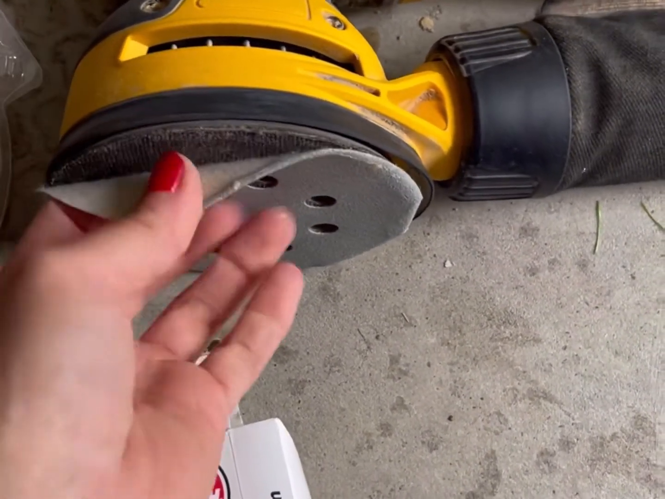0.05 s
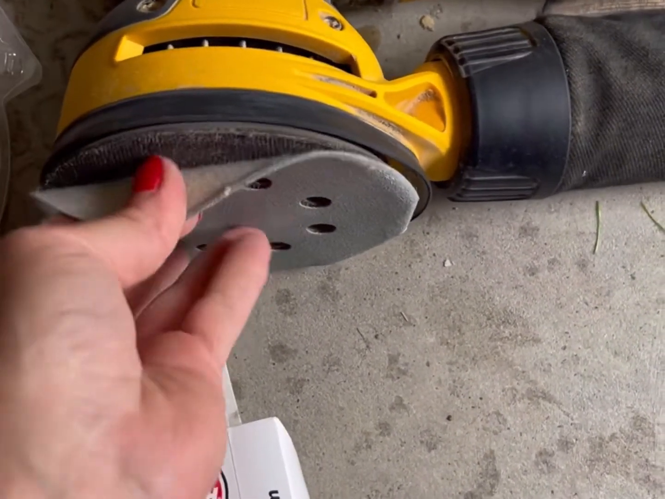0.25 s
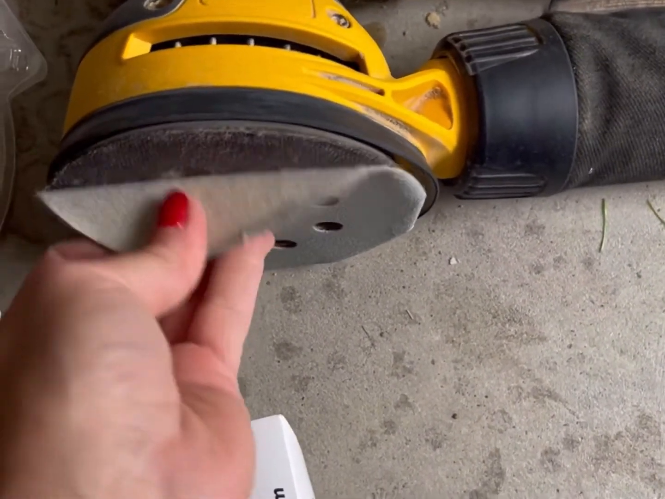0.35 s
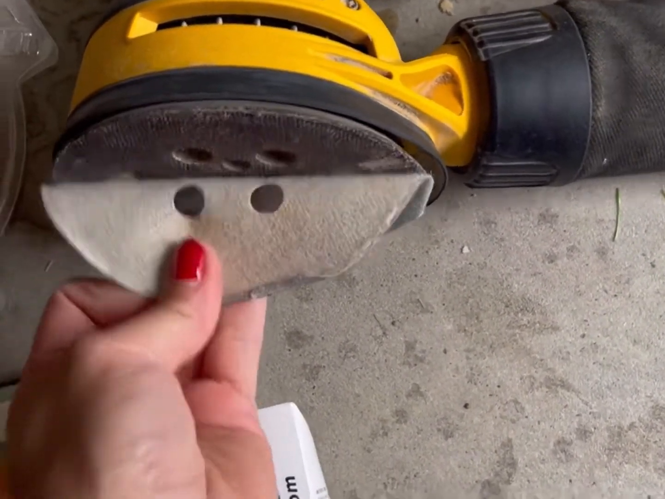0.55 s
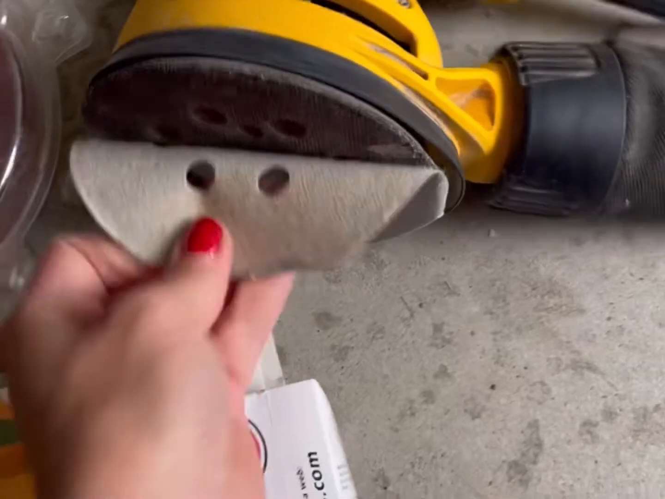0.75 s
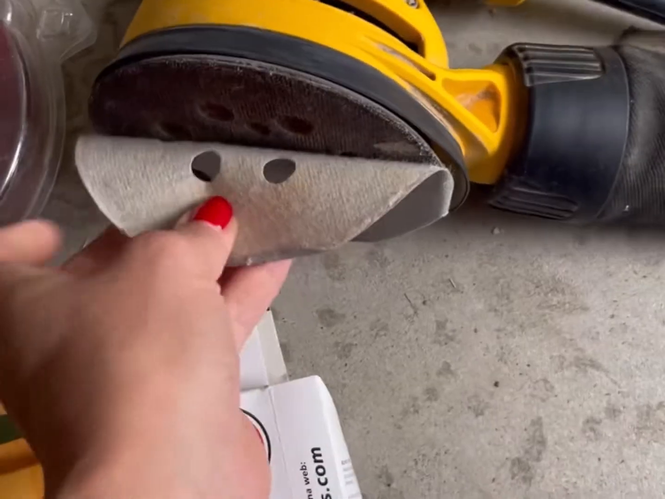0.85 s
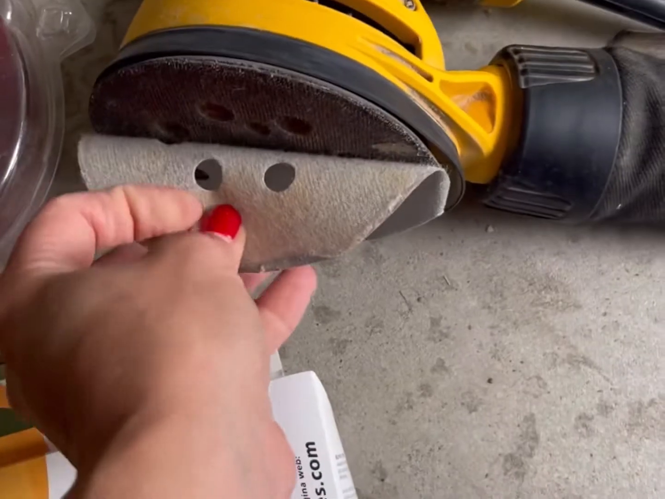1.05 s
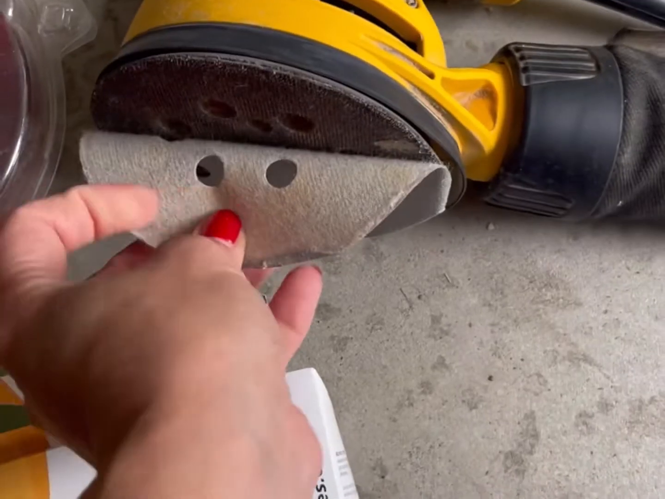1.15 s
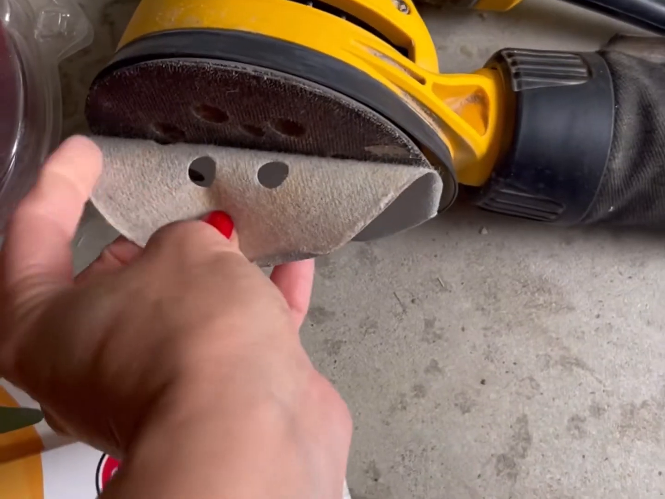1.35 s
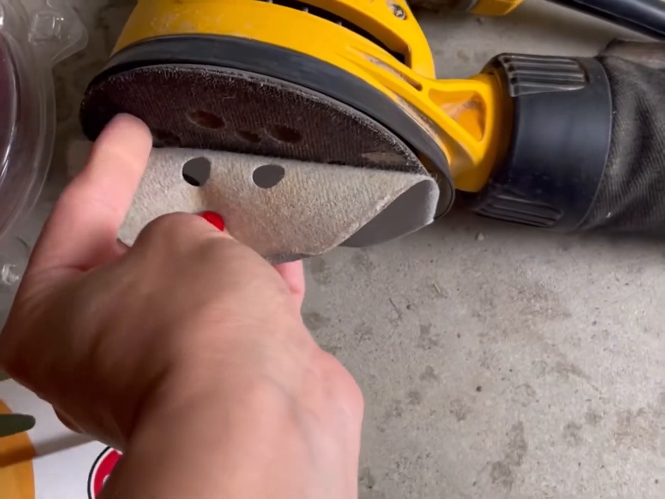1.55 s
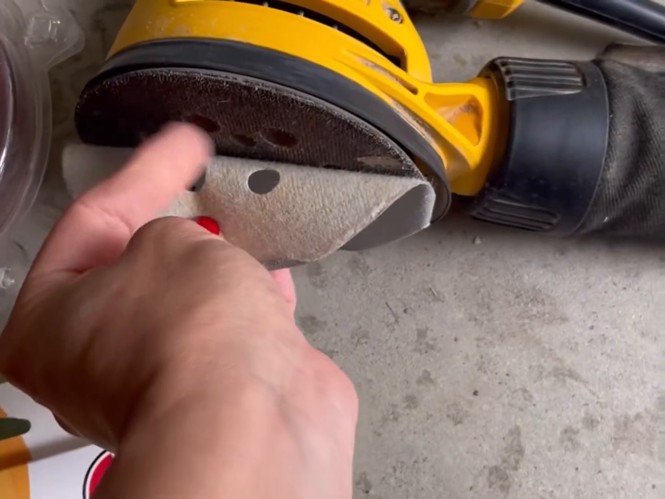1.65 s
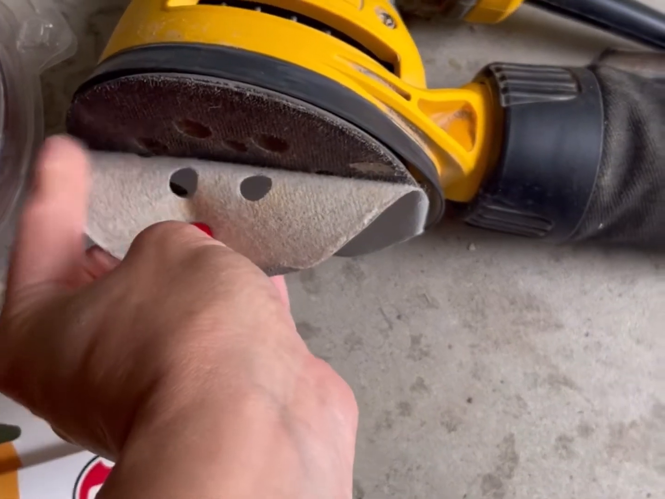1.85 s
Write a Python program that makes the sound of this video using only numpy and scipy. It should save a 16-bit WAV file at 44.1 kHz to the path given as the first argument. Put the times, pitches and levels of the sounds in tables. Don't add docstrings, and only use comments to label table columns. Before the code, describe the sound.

Dry, crackly tearing of a sanding disc peeled from its pad, followed by light fingernail taps

```python
import sys
import numpy as np
from scipy import signal
from scipy.fft import rfft, irfft
from scipy.io import wavfile
from scipy.ndimage import uniform_filter1d

SR = 44100
rng = np.random.default_rng(int(sys.argv[2]) if len(sys.argv) > 2 else 0)


def gain_from_decibels(decibels):
    exponent = np.asarray(decibels, float) / 20
    return 10 ** exponent


def materialize(psi):
    bounded = np.clip(np.atleast_2d(psi).T, -1, 1)
    quanta = np.round(bounded * 32767).astype(np.int16)
    wavfile.write(sys.argv[1], SR, quanta)


N = 83790
T = np.arange(N) / SR

# (time [s], hook level [dB], disc body against the hooks [dB])
PULL_STRENGTHS = [
    [(0, -52.5, 0), (.03, -44.5, -4), (.048, -50, -2.5), (.062, -49.5, 10), (.09, -57.5, 5), (.097, -52, 3)],
    [(.17, -54, 7), (.19, -48, 1), (.222, -57.5, -8.5), (.241, -48.5, -5.5)],
    [(.242, -34, -13.5), (.256, -21, -17), (.275, -23, -7.5), (.3, -22, -10), (.325, -18, -15),
     (.355, -18.5, -11), (.385, -26, -4), (.403, -29.5, -2), (.42, -33, -2)],
    [(.42, -34.5, 3.5), (.445, -37.5, -6), (.47, -30.5, -5), (.488, -24, -7.5), (.497, -22.5, 3),
     (.54, -18.5, 0.5), (.562, -21, 0.5), (.6, -33, 2.5), (.63, -36, 4)],
    [(.63, -25, 3), (.645, -31, 3.5), (.655, -42, 7), (.69, -49.5, 12.5), (.738, -47.5, 16.5),
     (.742, -40.5, 8.5), (.764, -43.5, 14), (.78, -57.5, 4.5), (.8, -59, 12)],
]
# (middle [s], length [s], level over the pull [dB])
HOOK_CLUMPS = [(0.2467, 0.005, 9.4), (0.2549, 0.0021, 2.6), (0.2584, 0.004, -11.4), (0.2617, 0.0025, 5.1),
               (0.2639, 0.0016, -4.8), (0.2656, 0.0012, 5.0), (0.2699, 0.0011, 5.2), (0.2721, 0.005, 6.9),
               (0.2806, 0.005, -6.0), (0.2839, 0.0016, 2.0), (0.2926, 0.0042, 5.4), (0.2961, 0.001, 4.4),
               (0.3058, 0.0017, -8.8), (0.3095, 0.0048, -10.3), (0.3145, 0.005, 8.2),
               (0.3198, 0.0017, -3.0), (0.3285, 0.0025, -2.9), (0.3302, 0.0018, 2.0), (0.3352, 0.005, -3.1),
               (0.3377, 0.0012, 3.7), (0.3465, 0.002, 8.0), (0.3522, 0.0036, -4.5), (0.3574, 0.0049, 5.3),
               (0.3647, 0.0025, -3.2), (0.3699, 0.0023, 4.9), (0.3749, 0.0038, -5.2),
               (0.3771, 0.0025, -3.4), (0.3826, 0.0011, 3.9), (0.3899, 0.0047, 10.0),
               (0.4076, 0.005, -10.5), (0.4128, 0.0025, 6.8), (0.4168, 0.0014, 7.8), (0.4228, 0.0047, 12.1),
               (0.435, 0.0029, 8.8), (0.4684, 0.0032, -7.7), (0.4754, 0.0033, 7.9), (0.4799, 0.005, -11.7),
               (0.4856, 0.0029, 8.1), (0.4916, 0.0035, -6.5), (0.4954, 0.0019, 5.2), (0.5116, 0.0039, 5.5),
               (0.5163, 0.0022, -4.6), (0.5278, 0.004, -4.9), (0.5325, 0.0018, -2.4), (0.5365, 0.0038, 4.2),
               (0.5408, 0.0041, -3.5), (0.5423, 0.0012, 2.3), (0.5507, 0.005, 4.8), (0.5655, 0.0015, -7.1),
               (0.5682, 0.0014, 2.3), (0.5737, 0.002, 3.2), (0.5769, 0.0013, 2.9), (0.5872, 0.0025, -5.2),
               (0.5892, 0.0019, 4.8), (0.5934, 0.0047, -7.1), (0.5964, 0.0024, 15.9), (0.6223, 0.0015, 4.3),
               (0.7037, 0.0027, 8.6), (0.7418, 0.0013, 8.9), (0.7456, 0.005, 10.3)]
# (frequency [Hz], level [dB])
HOOK_COLOUR = [(300, -33.5), (2000, -11.5), (3800, -4.5), (5200, 2.5), (7000, 0), (8300, -3.5),
               (11000, -0.5), (14000, -1)]
# (frequency [Hz], level [dB])
DISC_COLOUR = [(250, -20.5), (600, -10), (1100, -4), (1900, -6.5), (2700, -1), (3600, -0.5), (4500, -3),
               (7000, -14)]
# (middle [s], length [s], level [dB])
PAPER_FLEXES = [
    (0.36, 0.062, -47.5),
    (0.55, 0.075, -45.5),
    (0.739, 0.14, -57),
    (0.06, 0.16, -57.5),
    (.2, 0.045, -61.5),
]
# (frequency [Hz], level [dB])
PAPER_COLOUR = [(120, -28.5), (250, -2.5), (400, 4.5), (600, -1.5), (900, -8.5), (1500, -26), (4000, -51)]
# (time [s], level [dB], disc ring [dB], ring pitch [Hz])
TUFT_SNAPS = [(0.1356, -32, -32, 1200), (0.1406, -12.5, -21, 2200), (0.1408, -27.5, -40, 2200),
              (0.165, -31, -17, 3100), (0.216, -29.5, -25, 4370), (0.2306, -24, -22, 4400),
              (0.1642, -15.5, -14, 3130), (0.189, -37, -13.5, 2200), (0.2053, -23.5, -20, 4420),
              (0.212, -26.5, -20, 4400), (0.2238, -17, -16.5, 2200), (0.2374, -14, -11, 4560),
              (0.2413, -22, -15, 4000), (0.3758, -5.5, -19, 3800), (0.4208, -15.5, -1.5, 2730),
              (0.435, -22.5, 1, 2700), (0.58, -27.5, -1, 647), (.5128, -29.5, -4.5, 519),
              (0.5953, -5.5, -9, 3260), (0.6316, -21, -13, 3460), (0.6318, -8, -4.5, 3460),
              (0.6314, -11, -2.5, 1580), (0.64, -12, -15, 2620), (0.662, -14.5, -23, 2940),
              (.67, -18.5, 1.5, 3000), (0.704, -28, 3.5, 3090), (1.0962, -28.5, -6, 1050),
              (1.8676, -39.5, -7.5, 2700)]
# (time [s], level [dB], click [dB])
NAIL_TICKS = [
    (.8646, -31, -8),
    (.9864, -42, -9),
    (1.0814, -8, -20),
    (1.4675, -20, -13),
]
# (frequency [Hz], level [dB], t60 [s])
PAD_MODES = [(1050, -19.5, 0.017), (1633, -8.5, 0.013), (2200, -2.5, 0.011), (2700, -4, 0.0085),
             (3090, 0.5, 0.0072), (3580, -22, 0.0044), (4000, -27, 0.015), (5900, -0.5, 0.0032),
             (7500, 2, 0.003), (10700, -12, 0.003)]
# (middle [s], length [s], level [dB], skin body [dB])
FINGER_BRUSHES = [(1.106, 0.05, -65, 6.5), (1.29, 0.068, -53, -42), (1.442, 0.032, -53, -24),
                  (1.578, 0.0033, -59.5, 1), (1.587, 0.019, -62, 6.5), (1.611, 0.019, -53, 9.5),
                  (1.619, 0.0012, -53, 6.5), (1.623, 0.0087, -52, 6.5), (1.632, 0.0065, -57, 6),
                  (1.873, 0.017, -68, -1.5), (1.905, 0.0214, -57.5, 8), (0.836, 0.19, -65, -4.5),
                  (1.17, 0.12, -79.5, 10.5), (1.653, 0.059, -68, 0)]
# (frequency [Hz], level [dB])
SKIN_COLOUR = [(800, -20), (2000, -8), (3200, -10), (4200, 3), (5300, 2), (6200, -12), (7400, -3),
               (14000, -12)]
# (frequency [Hz], level [dB])
ROOM_COLOUR = [(28, -10), (60, 2.5), (120, -1), (260, -16), (600, -21.5), (900, -28), (3000, -34),
               (8500, -37.5)]
# (frequency [Hz], lead [rad])
PORT_LEAD_RAD = [(1700, 0), (4300, .9), (5500, 5.7), (8200, 8.5), (8600, 9.35), (9450, 9.5), (12100, 12.5),
                 (13800, 12.7)]
# (frequency [Hz], level [dB])
PORT_BALANCE = [(330, 0), (800, 6), (1700, 0), (3200, 1), (4400, -4), (5300, 0)]
# (frequency [Hz], level [dB])
NEAR_UNRELATED = [(150, -44), (600, -6), (2500, -21), (4700, -11), (7500, -10.5), (8500, -15), (9600, -16),
                  (11500, -12)]
# (frequency [Hz], level [dB])
ROOM_UNRELATED = [(150, -33.5), (400, -11), (1000, -5.5), (4200, -6), (5900, -26), (7300, -4), (8500, -25),
                  (9600, -30.5)]
# (frequency [Hz], level [dB])
MIC_RESPONSE = [(9300, 0), (10000, 3.5), (11150, 6.5), (12060, -2.5), (12750, -4.5), (13500, -13.5),
                (14200, -24), (15500, -37.5)]


def rip():
    clicks = hooks(per_s=6000, scatter_db=2.1, ring_s=.00035) * unit(gain_from_decibels(1.2 * walk(450)))
    even_s, even_share, clump_depth = .002, .85, .8
    local_power = uniform_filter1d(clicks ** 2, int(even_s * SR))
    clicks = unit(clicks / local_power ** (even_share / 2))
    clump_db = sum(db * np.exp(-((T - s) / (.75 * length)) ** 2) for s, length, db in HOOK_CLUMPS)
    clicks = clicks * gain_from_decibels(clump_depth * clump_db)
    pull, body = np.zeros(N), np.zeros(N)
    for rows in PULL_STRENGTHS:
        s, db, body_db = np.array(rows).T
        inside = (T >= s[0]) & (T < s[-1])
        pull += inside * gain_from_decibels(np.interp(T, s, db))
        body += inside * gain_from_decibels(np.interp(T, s, db + body_db))
    body_flutter = gain_from_decibels(1.6 * walk(120))
    hook_flutter = gain_from_decibels(.4 * walk(150))
    bare_hooks = colour(clicks * pull * hook_flutter, HOOK_COLOUR)
    shaken_disc = colour(clicks * body * body_flutter, DISC_COLOUR)
    return bare_hooks + gain_from_decibels(-9.0) * shaken_disc


def snaps():
    rise_s, fall_s, ring_cycles = .0005, .0009, 2.4
    noise, burst, ring = rng.standard_normal(N), np.zeros(N), np.zeros(N)
    t = np.arange(1024) / SR
    rise = (t / rise_s) ** 2 / (1 + (t / rise_s) ** 2)
    shape = rise * (np.exp(-t / fall_s) + gain_from_decibels(-30.5) * np.exp(-t / .006))
    for s, db, ring_db, hz in TUFT_SNAPS:
        at = slice(int(s * SR), int(s * SR) + len(t))
        burst[at] += gain_from_decibels(db + 0.5) * shape
        cycles = t * hz / ring_cycles
        ring[at] += gain_from_decibels(db + ring_db) * np.sin(2 * np.pi * hz * t) * cycles * np.exp(-cycles)
    torn = noise * burst
    return colour(torn, HOOK_COLOUR) + gain_from_decibels(-12.5) * colour(torn, DISC_COLOUR) + ring


def flexes():
    crumple = hooks(per_s=1500, scatter_db=3, ring_s=.0011) * gain_from_decibels(1.4 * walk(80.2))
    return colour(crumple * sum(swell(*row) for row in PAPER_FLEXES), PAPER_COLOUR)


def ticks():
    out, click = np.zeros(N), np.zeros(N)
    t = np.arange(2048) / SR
    chance = rng.standard_normal((len(NAIL_TICKS), 2, len(PAD_MODES)))
    crack = rng.standard_normal(N)
    rise = 1 - np.exp(-t / .0003)
    for (s, db, click_db), (level_draws, pitch_draws) in zip(NAIL_TICKS, chance):
        ring = np.zeros(len(t))
        for (hz, mode_db, t60), level, pitch in zip(PAD_MODES, level_draws, pitch_draws):
            tone = np.sin(2 * np.pi * hz * (1 + 0.02 * pitch) * t)
            ring += gain_from_decibels(mode_db + 0.63 * level) * tone * np.exp(-np.log(1000) * t / t60)
        at = slice(int(s * SR), int(s * SR) + len(t))
        out[at] += gain_from_decibels(db - 5.5) * ring * rise
        click[at] += gain_from_decibels(db + click_db) * np.exp(-t / 0.002)
    return out + colour(crack * click, HOOK_COLOUR)


def brushes():
    grain = hooks(per_s=6000, scatter_db=2.6, ring_s=.0006) * unit(gain_from_decibels(1.6 * walk(200)))
    thin, full = np.zeros(N), np.zeros(N)
    for s, length, db, body_db in FINGER_BRUSHES:
        shape = swell(s, length, db)
        thin += shape
        full += shape * gain_from_decibels(body_db)
    return colour(grain * thin, HOOK_COLOUR) + gain_from_decibels(3) * colour(grain * full, SKIN_COLOUR)


def hand_bump():
    since = np.clip(T - 1.329, 0, None)
    return gain_from_decibels(-34) * np.sin(2 * np.pi * 170 * since) * np.exp(-since / 0.01)


def bench_tail(near):
    t60_s, tail_db = .1, -21
    t = np.arange(8192) / SR
    echoes = rng.standard_normal(len(t)) * np.exp(-np.log(1000) * t / t60_s)
    echoes = echoes / np.sqrt(np.sum(echoes ** 2))
    return gain_from_decibels(tail_db) * signal.fftconvolve(near, echoes)[:N]


def hum():
    hum_hz, hum_db, wobble_db = 118.9, -51.5, 4.5
    phase = 2 * np.pi * np.cumsum(hum_hz * (1 + 0.013 * walk(11.39))) / SR
    return np.sqrt(2) * gain_from_decibels(hum_db + wobble_db * walk(8)) * np.sin(phase)


def room():
    room_db, top_hz = -48, 11000
    hz = np.fft.rfftfreq(N, 1 / SR)
    shape = gain_from_decibels(along(ROOM_COLOUR, hz)) / (1 + (hz / top_hz) ** 8)
    white = rng.standard_normal(N) * gain_from_decibels(1.3 * walk(9))
    return irfft(rfft(white) * shape, N) * gain_from_decibels(room_db) / np.sqrt(np.mean(shape ** 2))


def hooks(per_s, scatter_db, ring_s):
    chance = rng.random(N)
    size = np.minimum(rng.exponential(size=N), 3.5)
    sparks = (chance < per_s / SR) * gain_from_decibels(2 * scatter_db * size)
    power = signal.lfilter([1], [1, -np.exp(-1 / max(SR * ring_s, 1))], sparks)
    return unit(np.sqrt(np.abs(power) + 1e-6) * rng.standard_normal(N))


def swell(s, length, db):
    return gain_from_decibels(db) * np.exp(-np.minimum(np.abs(T - s) / (0.6 * length), 4) ** 2.2)


def walk(rate):
    hold = int(SR / rate)
    return unit(uniform_filter1d(rng.standard_normal(N)[np.arange(N) // hold], hold))


def unit(x):
    return x / np.sqrt(np.mean(x ** 2))


def along(points, hz):
    p = np.array(points, float)
    return np.interp(np.log(hz + 1), np.log(p[:, 0]), p[:, 1])


def colour(x, points):
    cepstrum = irfft(np.log(gain_from_decibels(along(points, np.linspace(0, SR / 2, 513)))))
    cepstrum[1:512] *= 2
    cepstrum[513:] = 0
    h = irfft(np.exp(rfft(cepstrum)))
    return signal.fftconvolve(x, h / np.sqrt(np.sum(h ** 2)))[:N]


def ports(x, other, unrelated):
    hz = np.fft.rfftfreq(N, 1 / SR)
    half = gain_from_decibels(along(PORT_BALANCE, hz) / 2) * np.exp(.5j * along(PORT_LEAD_RAD, hz))
    common = rfft(x)
    apart = rfft(other) * gain_from_decibels(along(unrelated, hz))
    return np.array([irfft((common + apart) * half, N), irfft((common - apart) / half, N)])


def mask(x):
    from_hz, mask_db, floor_db = 8200, -22, -98.5
    sudden_db, sudden_mask_db = 7, -38
    mid_side = np.array([x[0] + x[1], x[0] - x[1]]) / 2
    hz, _, z = signal.stft(mid_side, SR, "hann", 1024)
    bands = z[:, :512].reshape(2, 64, 8, -1)
    power = np.repeat(np.mean(np.abs(bands) ** 2, axis=2), 8, axis=1)
    power = uniform_filter1d(power, size=3, axis=2)
    high = hz[:512] > from_hz
    top = power[:, high].max(axis=(0, 1))
    sudden = top > gain_from_decibels(2 * sudden_db) * np.roll(top, 2)
    depth_db = np.where(sudden, sudden_mask_db, mask_db)
    edge = np.maximum(top * gain_from_decibels(2 * depth_db), gain_from_decibels(2 * floor_db))
    keep = np.pad((power > edge) | ~high[:, None], ((0, 0), (0, 1), (0, 0)))
    mid, side = signal.istft(z * keep, SR, "hann", 1024)[1][:, :N]
    return np.array([mid + side, mid - side])


def scene():
    near = rip() + flexes() + snaps() + ticks() + brushes()
    close = ports(near + bench_tail(near), near * walk(450), NEAR_UNRELATED)
    background = ports(room() + hum() + hand_bump(), room(), ROOM_UNRELATED)
    return close + background


def top_cut(x):
    return signal.sosfilt(signal.butter(12, 16340, fs=SR, output="sos"), x)


def record(dry):
    gain = gain_from_decibels(along(MIC_RESPONSE, np.fft.rfftfreq(N, 1 / SR)))
    heard = irfft(rfft(dry) * gain, N)
    mix = mask(np.tanh(heard))
    return top_cut(mix)


dry = scene()
out = record(dry)
materialize(out)
```